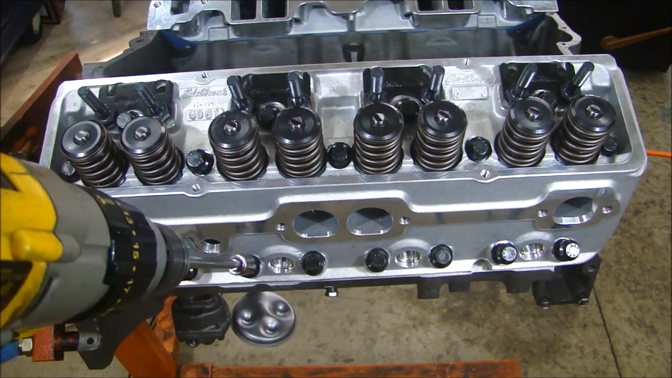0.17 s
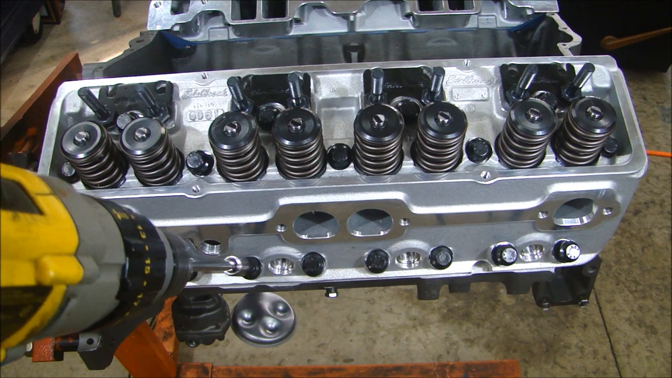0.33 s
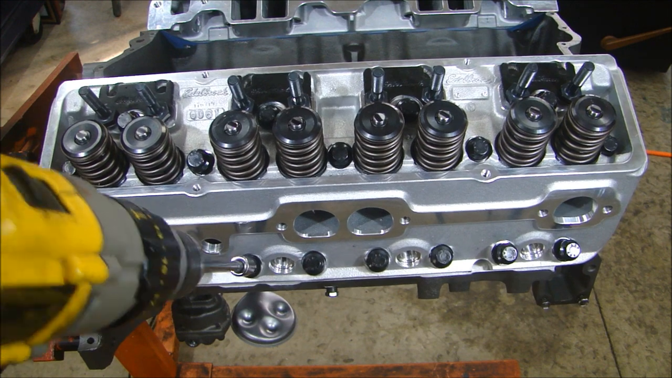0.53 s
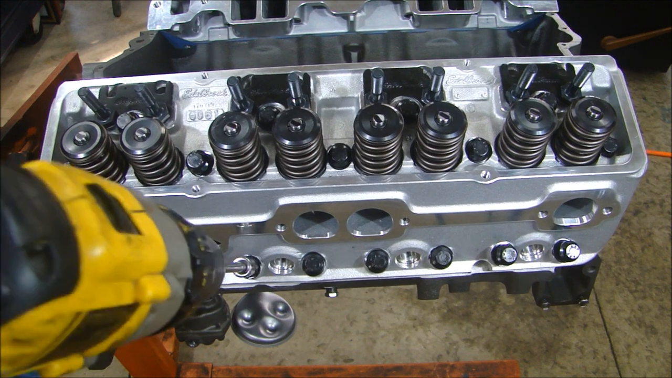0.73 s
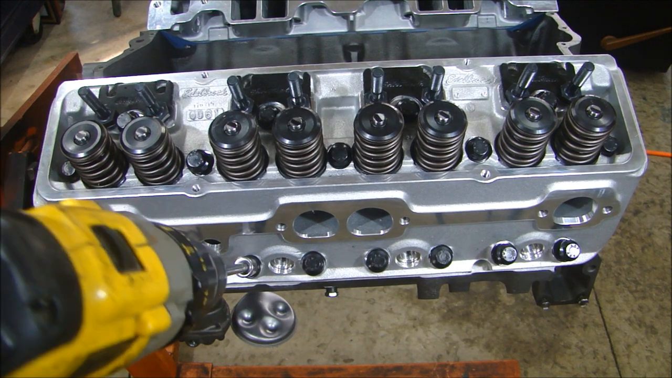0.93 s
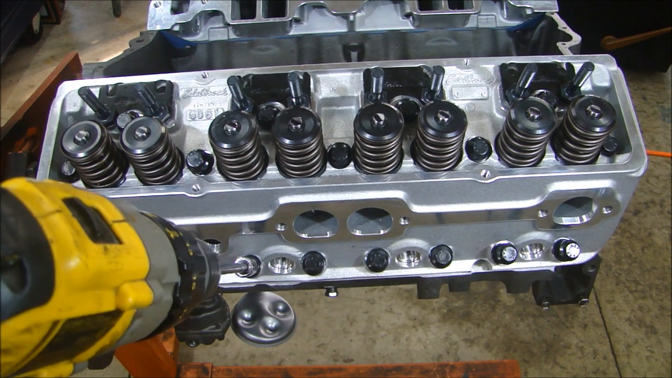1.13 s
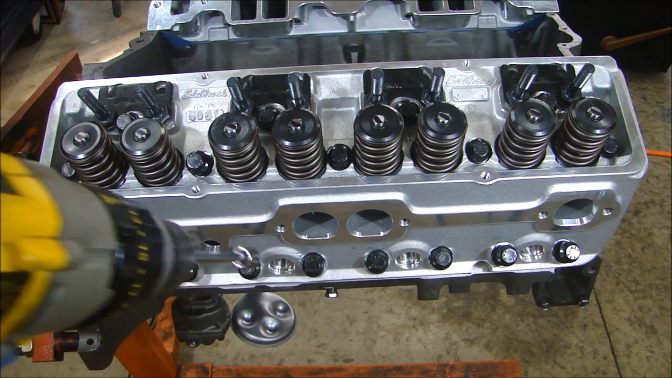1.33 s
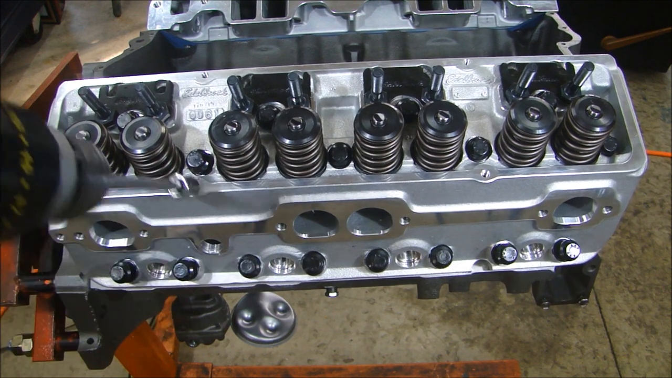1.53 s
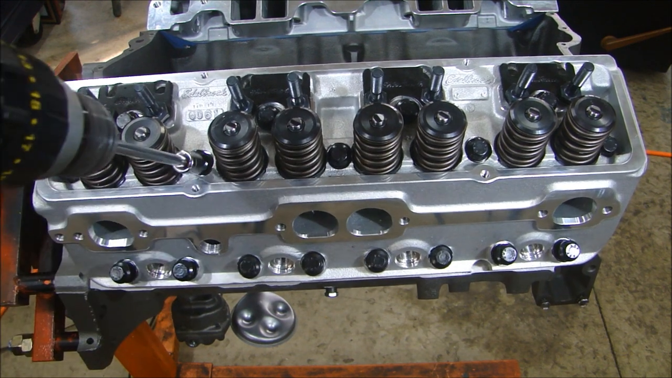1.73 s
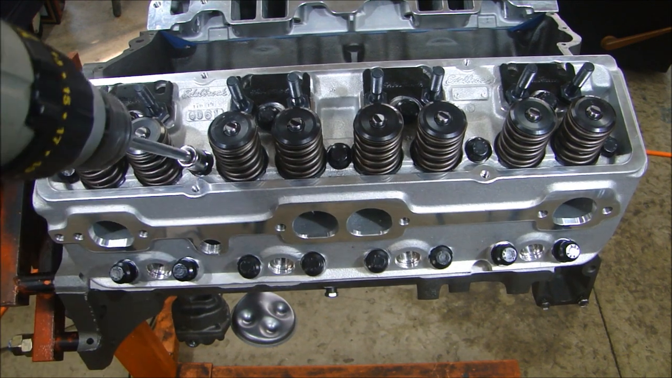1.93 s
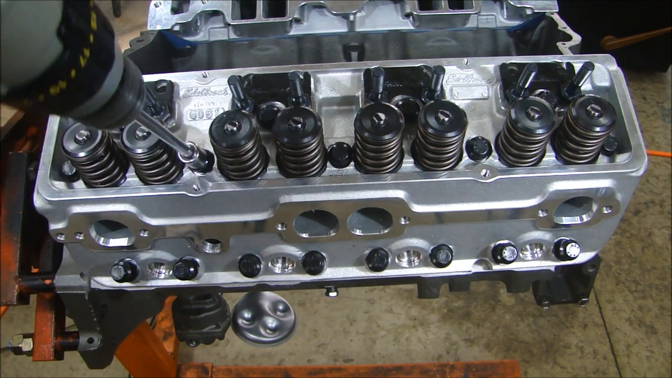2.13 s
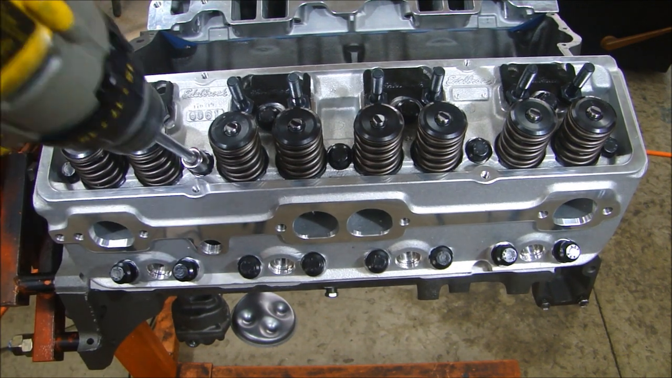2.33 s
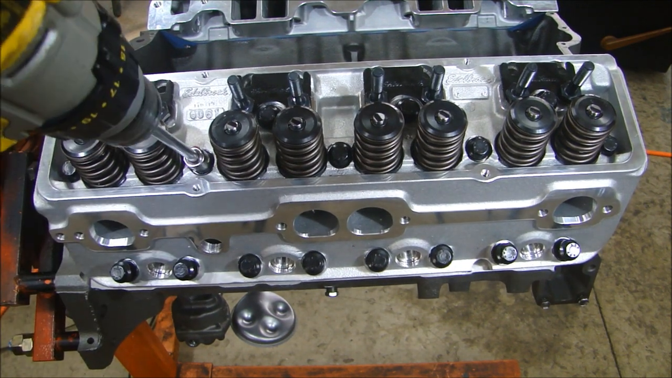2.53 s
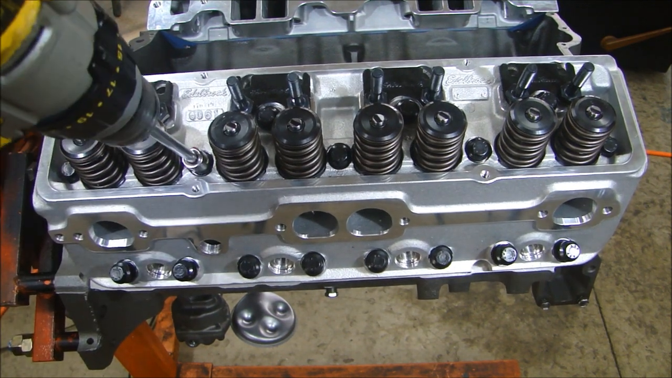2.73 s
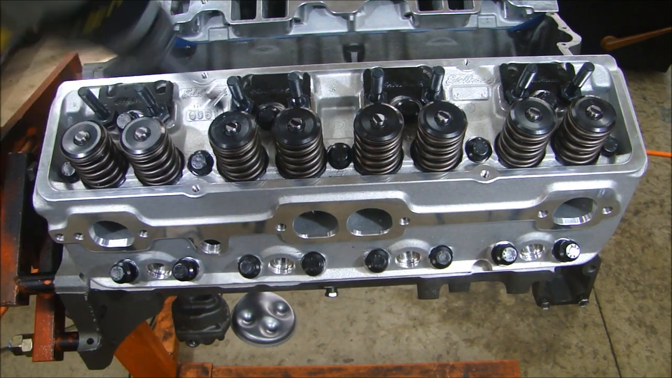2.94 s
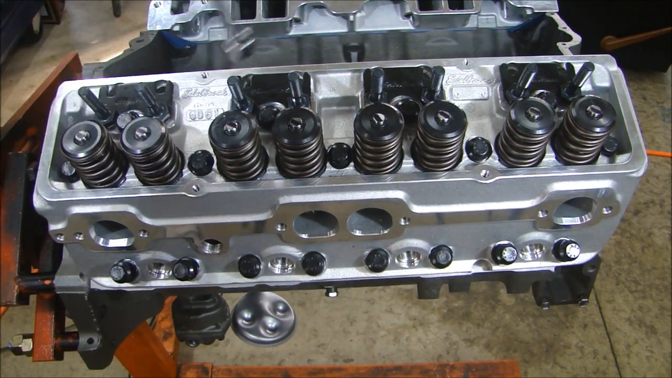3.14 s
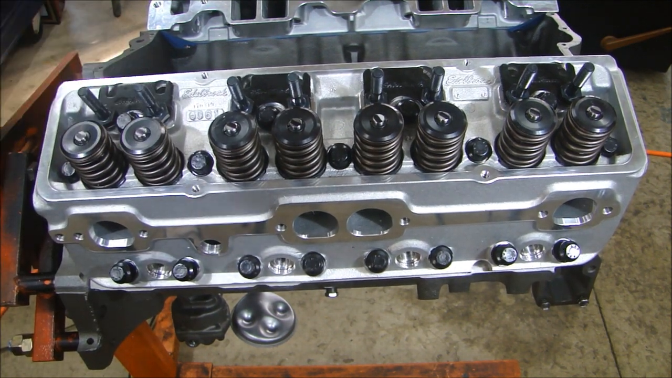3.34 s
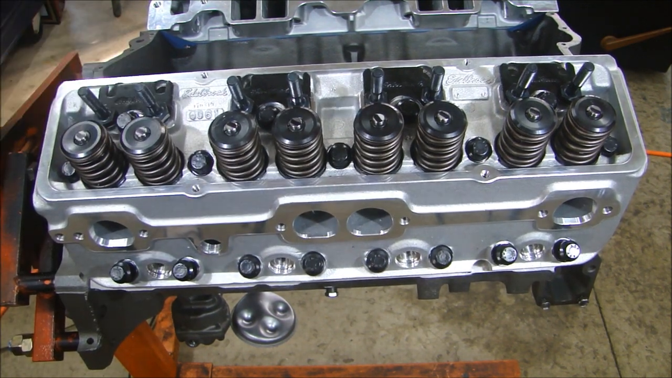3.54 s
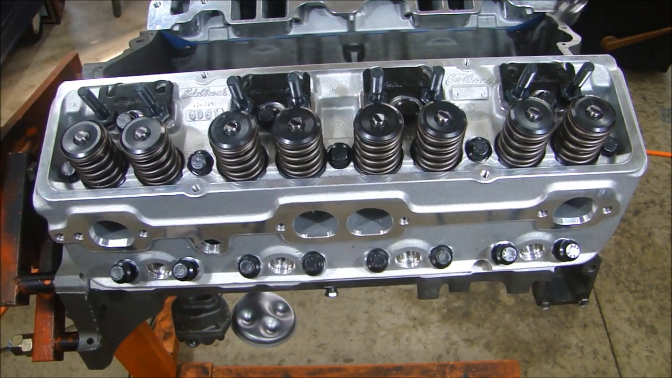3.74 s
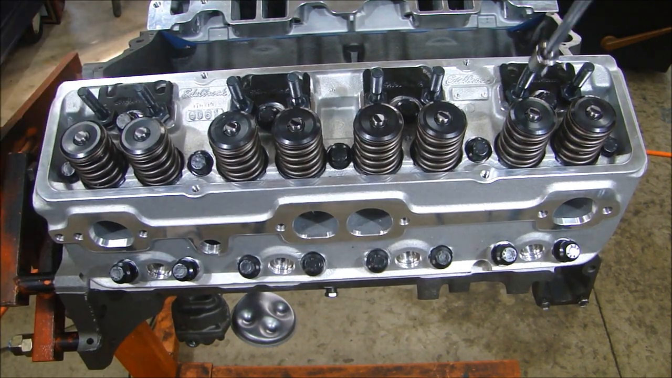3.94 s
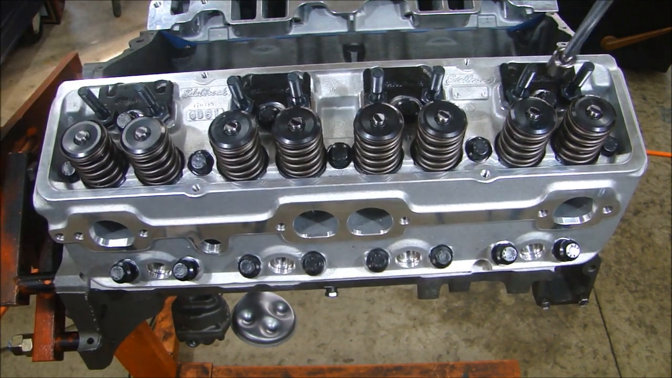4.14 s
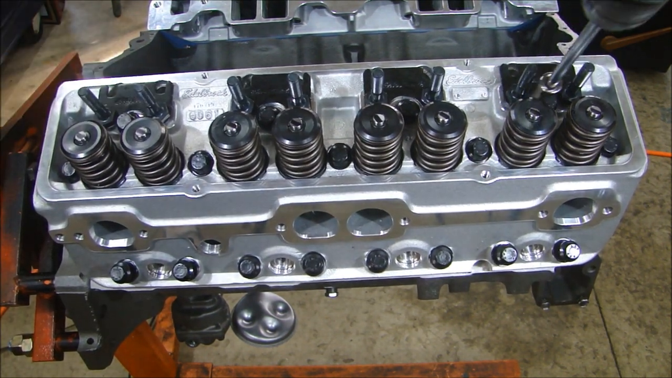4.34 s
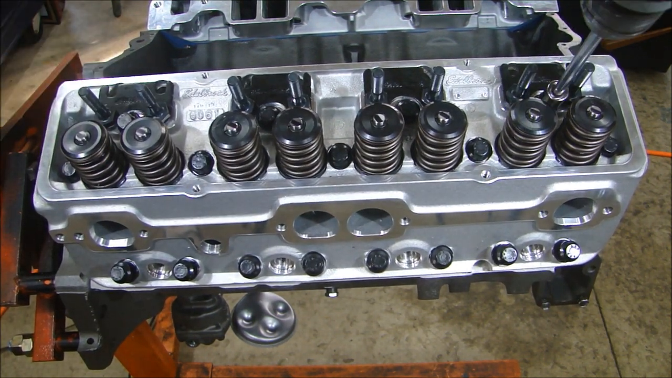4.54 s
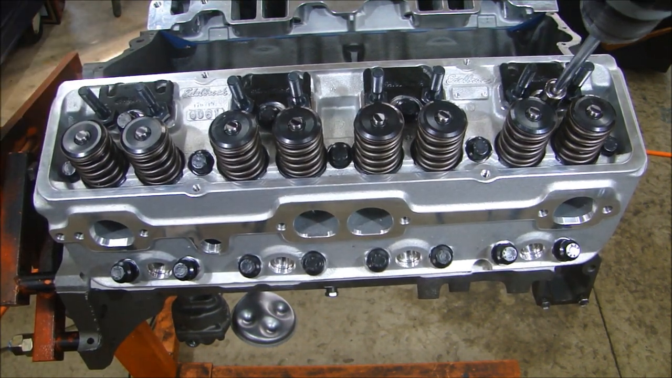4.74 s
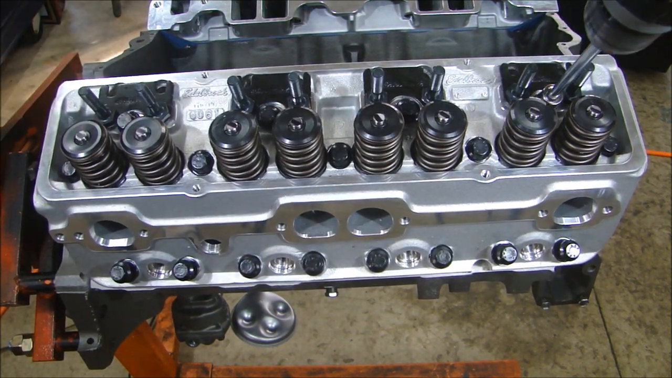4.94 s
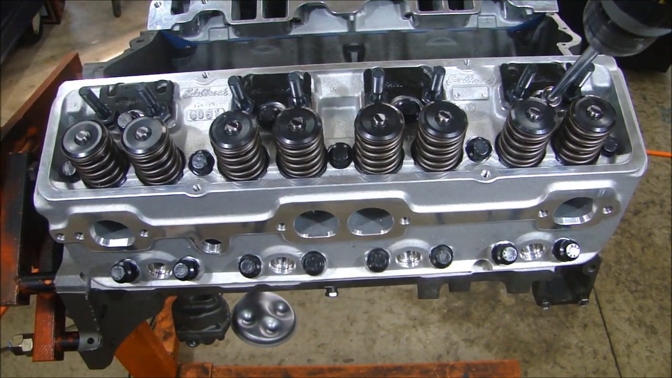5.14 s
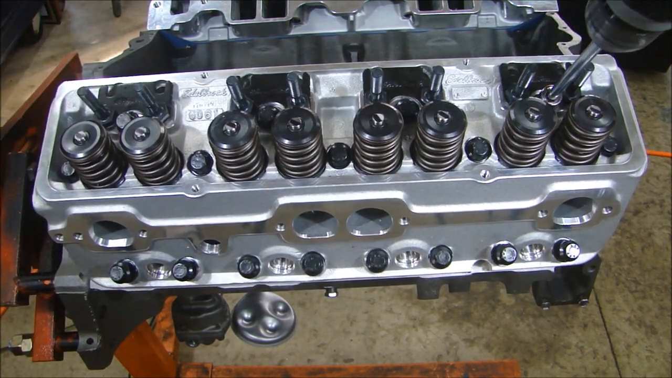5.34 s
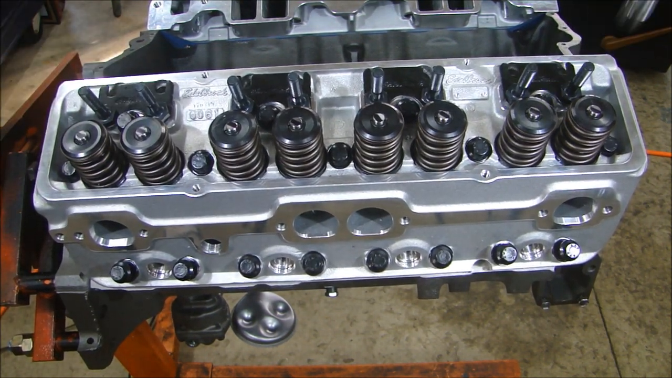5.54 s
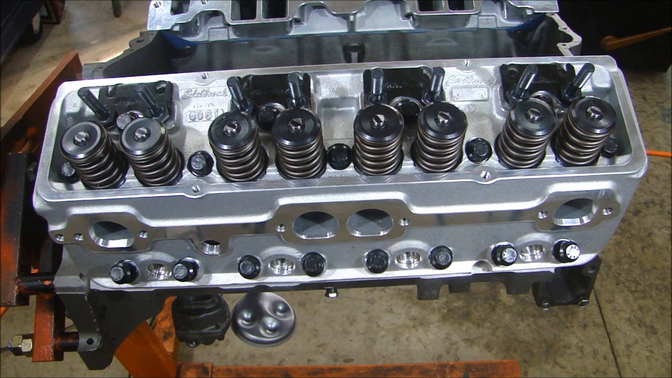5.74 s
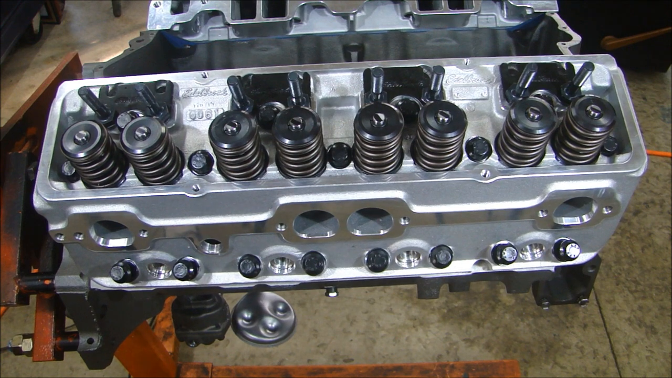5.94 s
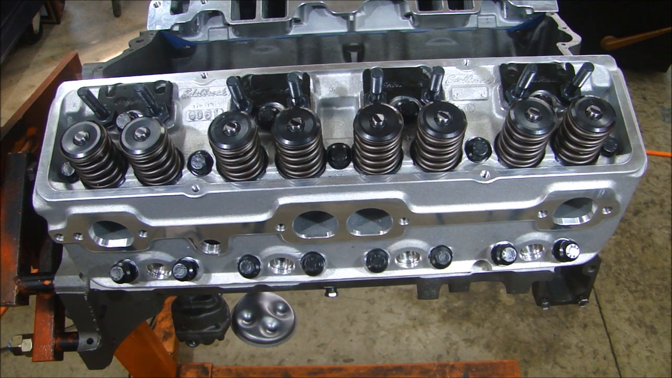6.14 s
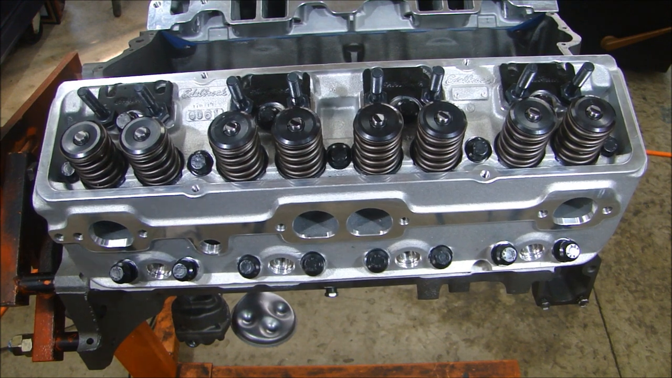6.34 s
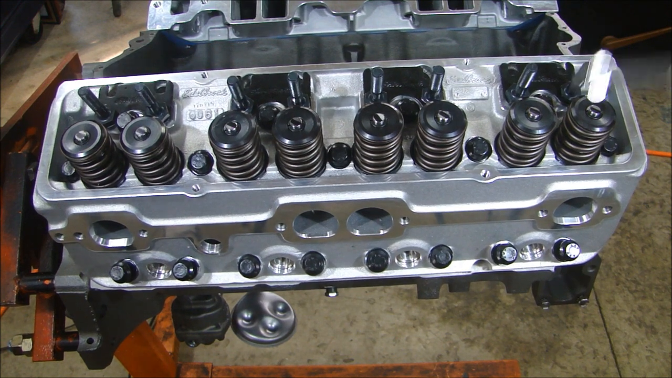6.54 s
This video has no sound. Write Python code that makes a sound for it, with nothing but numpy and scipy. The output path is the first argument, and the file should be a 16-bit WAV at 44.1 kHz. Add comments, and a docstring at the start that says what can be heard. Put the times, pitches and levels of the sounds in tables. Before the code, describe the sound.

Sharp metallic knocks come first, then a cordless drill bursts into a gritty, rising whine, a bolt clunks tight, and the clutch chatters in a harsh buzz before an abrupt brake click. This happens three times, with pauses of steel taps, cloth brushes and faint squeaks. Close, bright stereo with short garage echoes and quiet room hiss; the drill moves from left to right.

```python
"""In a garage, close to a pair of microphones, a steel extension rubs, knocks and rings on a cylinder head.
A cordless drill then runs down the first of three bolts: clacks, a motor spinning up and whining through its
gears, the clunk of the bolt seating, a ratcheting slip clutch, the spindle brake. Knocks and scuffs fill the
gaps before the second and third bolts, with faint squeaks from the later gap on; knocks and scuffs end it.
Noise, shaped and gated, makes the rough sounds; sines on motor and clutch turns make the whine and the buzz."""
import sys
import numpy as np
from scipy import signal
from scipy.fft import rfft, irfft
from scipy.io import wavfile
from scipy.ndimage import map_coordinates

SR = 44100
rng = np.random.default_rng(int(sys.argv[2]) if len(sys.argv) > 2 else 0)


def gain_from_db(level_db):
    """Convert decibel levels to linear amplitude factors (20 dB per decade)."""
    decades = np.asarray(level_db, float) / 20
    return 10 ** decades


def dump(signal):
    """Clip the signal to [-1, 1] and save it as 16-bit WAV at the path in sys.argv[1]."""
    limited = np.clip(np.atleast_2d(signal).T, -1, 1)
    pcm = np.round(limited * 32767).astype(np.int16)
    wavfile.write(sys.argv[1], SR, pcm)


N = 294588
TIME = np.arange(N) / SR


def rms_one(x):
    """Scale to rms 1."""
    return x / np.sqrt(np.mean(x ** 2) + 1e-20)


def at_hz(points, hz):
    """Read a table on a log-frequency axis."""
    table_hz, value = np.array(points).T
    return np.interp(np.log(hz), np.log(table_hz), value)


def coloured(x, spectrum):
    """Shape a signal by a spectrum in dB; rms 1."""
    hz = np.maximum(np.fft.rfftfreq(x.shape[-1], 1 / SR), 10)
    return rms_one(irfft(rfft(x) * gain_from_db(at_hz(spectrum, hz)), x.shape[-1]))


def drift(rate):
    """Slow chance of spread near 1: random knots, two per cycle of the rate [Hz], joined by lines."""
    knots = rng.standard_normal(int(N / SR * 2 * rate) + 2)
    return np.interp(TIME * 2 * rate, np.arange(len(knots)), knots) * 1.406


def cut(x, hz, kind, order=2):
    """Butterworth low- or high-pass."""
    return signal.sosfilt(signal.butter(order, min(hz, .45 * SR), kind, fs=SR, output="sos"), x)


def ring(clicks, hz, t60):
    """A unit click sets a dying sine of height 1 ringing, as one mode of a solid does."""
    r, w = gain_from_db(-60 / (t60 * SR)), 2 * np.pi * hz / SR
    return signal.lfilter([0, np.sin(w)], [1, -2 * r * np.cos(w), r * r], clicks + 1e-18)


def ramp(start, length):
    """0 before the start, 1 after the length."""
    return np.clip((TIME - start) / np.maximum(length, 1e-3), 0, 1)


def dying(start, length):
    """1 at the start, then an exponential decay; 0 before."""
    return (TIME >= start) * np.exp(-np.clip(TIME - start, 0, None) / length)


def swell(start, end):
    """A half sine between two times."""
    return np.sin(np.pi * ramp(start, end - start)).clip(0)


# the three trigger pulls:
# (trigger pressed [s], bolt seats [s], clutch falls silent [s], spindle stops [s])
TRIGGER_PULLS = [(.687, 1.012, 1.228, 1.262), (2.119, 2.538, 2.745, 2.77), (4.768, 5.142, 5.35, 5.398)]


def per_pull(rows):
    """Each column of a one-row-a-pull table, held from 0.1 s before its pull to the next."""
    pull = np.searchsorted([row[0] - .1 for row in TRIGGER_PULLS[1:]], TIME)
    return np.array(rows, float)[pull].T


# background of the garage: (frequency [Hz], relative density [dB per Hz])
AIR_SPECTRUM = [(24, -37), (40, -10.5), (298, -3.5), (496, -6), (631, -5), (844, -3.5), (2220, -13),
                (4700, -16), (5310, -25.5), (7450, -24.5), (13000, -27)]


def garage_air():
    """Steady background noise, unrelated at the two microphones, swelling slowly on both together."""
    air = coloured(rng.standard_normal((2, N)), AIR_SPECTRUM)
    return gain_from_db(-67.5) * gain_from_db(0.79 * drift(3.4)) * air


# steel rubbing: (frequency [Hz], relative density [dB per Hz])
RUB_SPECTRUM = [(150, -25), (400, -6), (1300, 0), (2100, -1), (3200, -10), (12000, -40)]
# cloth brushing: (frequency [Hz], relative density [dB per Hz])
BRUSH_SPECTRUM = [(1000, -30), (3000, -5), (5000, 0), (11000, -1)]
# handling strokes: (start [s], end [s], socket rubbing level [dB], sleeve brushing level [dB])
HANDLING_STROKES = [(-.06, 0.11, -63.5, -59), (1.827, 1.94, -56.5, -70), (3.007, 3.058, -60, -54),
                    (3.075, 3.192, -88, -54), (3.446, 4.02, -80, -79.5), (4.721, 4.765, -52.5, -93),
                    (5.885, 6.076, -56, -38.5), (6.01, 6.27, -61, -50), (6.254, 6.37, -66, -49.5)]


def scuffs(grain, patchy_db):
    """Rubbing is dense uneven grains in patches; cloth brushes more smoothly and higher."""
    skid_db, skid_brush_db, skid_fade_db_s = -27, -3, 277   # re knock, brush re skid, fade
    skid_s = 20 / np.log(10) / skid_fade_db_s
    # the socket skids after each knock
    skid = sum(gain_from_db(db + skid_db) * dying(s, skid_s) for s, db, *_ in EXTENSION_KNOCKS)
    rub, brush = skid, gain_from_db(skid_brush_db) * skid
    for start, end, rub_db, brush_db in HANDLING_STROKES:
        stroke = swell(start, end)
        rub = rub + gain_from_db(rub_db) * stroke
        brush = brush + gain_from_db(brush_db) * stroke ** 2
    uneven_db = grain * np.minimum(rng.exponential(1, N), 5)
    grains = rng.standard_normal(N) * gain_from_db(uneven_db + patchy_db * drift(60))
    cloth = rng.standard_normal(N) * gain_from_db(3.5 * drift(46))
    return rub * coloured(grains, RUB_SPECTRUM) + brush * coloured(cloth, BRUSH_SPECTRUM)


def cracks(blows):
    """Blows (s, rough peak dB, centre Hz, octaves) as noise bands; lower ones die more slowly."""
    snap, snap_s = 0.69, 0.0022   # the first contact is sharper than the crack after it
    t60_s = 0.045   # at 1.5 kHz
    out, after = np.zeros(N + SR), np.arange(SR // 8) / SR
    for s, db, hz, octaves in blows:
        at, wide = round(s * SR), 2 ** (max(octaves, .3) / 2)
        band = signal.butter(2, [hz / wide, min(hz * wide, .45 * SR)], "band", fs=SR, output="sos")
        decay = gain_from_db(-60 * after / (t60_s * (1500 / hz) ** 0.33))
        contact = 1 + snap * np.exp(-after / snap_s)
        crack = signal.sosfilt(band, rng.standard_normal(len(after)) * contact * decay)
        peak = 3 * np.sqrt(np.mean(crack[:SR // 400] ** 2))   # noise peaks near three times its rms
        out[at:at + len(after)] += gain_from_db(db) * crack / peak
    return out[:N]


# the extension against the head: (time [s], peak level [dB], centre [Hz], width [octaves])
EXTENSION_KNOCKS = [(.112, -43, 900, 1.8), (.137, -19, 2430, 5.1), (.149, -23.5, 1960, 2),
                    (.169, -29, 2760, 2.6), (.27, -40.5, 3500, 2.3), (.279, -35, 1400, 3.3),
                    (.291, -34.5, 850, 1.4), (.344, -38, 664, 5.4), (.431, -41, 2210, 2.4),
                    (.44, -20, 2550, 6.3), (.468, -29, 810, 3), (.586, -38, 427, 4.1),
                    (.595, -40, 2240, 3.4), (1.835, -33, 3570, 2.3), (1.857, -33.5, 1850, 1.8),
                    (1.918, -58, 2060, 2.2), (3.013, -27.5, 2000, 3.5), (3.035, -31.5, 1250, 1.5),
                    (3.075, -26, 2870, 3.3), (3.117, -30.5, 2210, 4.1), (3.75, -60, 4000, 4.1),
                    (3.843, -59, 1800, 1.6), (3.963, -61, 3000, 3.7), (4.065, -36, 1440, 2.5),
                    (4.077, -24, 1110, 2.8), (4.13, -49, 1410, 0.74), (4.449, -33.5, 3174, 6.1),
                    (4.453, -12.5, 1110, 2.36), (4.524, -30.5, 815, 2.8), (4.633, -49, 1090, 2.7),
                    (5.741, -31.5, 3930, 3.7), (5.862, -42, 3330, 2.5), (5.929, -32, 2500, 3.1),
                    (5.954, -33, 1820, 2.9), (5.965, -28, 1900, 5.2), (6.018, -36, 1280, 3.9),
                    (6.073, -39, 1640, 2.1), (6.103, -50, 1500, 2.5), (6.238, -36.5, 734, 0.92),
                    (6.264, -43, 1210, 2.8), (6.337, -44.5, 615, 1.3), (6.38, -42, 725, 1.4)]


def extension_knocks():
    """The steel extension knocks on the head, each blow a dying crack around its own centre."""
    return cracks(EXTENSION_KNOCKS)


# modes of the steel extension and head: (frequency [Hz], level [dB], t60 [s])
STEEL_MODES = [(2000, -6, .25), (2900, -12, .6), (3500, -10, .15), (4400, -6, .4), (4650, -6, .3),
               (7400, -8, .2)]
# knocks that leave the free extension ringing: (time [s], level [dB])
RINGING_KNOCKS = [(0.441, -64), (1.834, -64), (3.077, -61), (3.12, -62), (4.078, -73), (4.455, -69)]


def steel_ringing():
    """Some knocks set the modes of the steel ringing, each mode struck a little differently."""
    s, db = np.transpose(RINGING_KNOCKS)
    out = 0
    for hz, mode_db, t60 in STEEL_MODES:
        strikes = np.zeros(N)
        strikes[(s * SR).astype(int)] = gain_from_db(db + rng.normal(0, 3, len(s)))
        out = out + gain_from_db(mode_db) * ring(strikes, hz, t60)
    return out


# trigger ticks, gear take-up and brake: (time [s], peak level [dB], centre [Hz], width [octaves])
DRILL_CLACKS = [(0.675, -42.5, 1820, 1.1), (.702, -14, 1370, 1.7), (.714, -7, 1130, 1.3),
                (.721, -7, 2760, 3), (1.237, -6, 3020, 3.3), (1.257, -3, 3000, 2.93),
                (2.079, -47, 2770, 1.4), (2.101, -44.5, 1900, 1.5), (2.763, -10.5, 2940, 2.2),
                (4.726, -42, 1770, 2.9), (4.776, -11.5, 1840, 3.2), (5.366, -36, 3500, 1.9),
                (5.392, -16.5, 3200, 1.4)]


def drill_clacks():
    """Parts inside the drill strike each other in short cracks."""
    return cracks(DRILL_CLACKS)


# motor of each pull: (half speed reached [s], time constant [s], top speed [turns per s])
MOTOR_SPINUPS = [(.69, .058, 273.5), (2.158, .044, 265.5), (4.798, .047, 267.5)]


def motor_turning():
    """The motor nears top speed exponentially and loses turns as the bolt tightens."""
    press, seat, release, stop = per_pull(TRIGGER_PULLS)
    half, rise, top = per_pull(MOTOR_SPINUPS)
    slow = np.exp(-np.clip(TIME - half, -rise / 4, None) / rise) / 2   # share of top speed still missing
    load_sag_hz, load_s = 7, 0.048   # turns per s lost by the time of seating, growth
    speed = top * (1 - slow) - load_sag_hz * np.exp(np.clip((TIME - seat) / load_s, None, 1))
    turn = 2 * np.pi * np.cumsum(speed * (1 + .001 * drift(40))) / SR
    gate = ramp(press, 0.03) * (1 - ramp(stop - .003, 0.001))
    free = gate * (1 - ramp(seat, 0.023))   # closes after seating
    return turn, slow, gate, free


# gear noise: (frequency [Hz], relative density [dB per Hz])
GEAR_SPECTRUM = [(100, -59), (250, -23.5), (700, -9.5), (1500, -8.5), (2500, -5), (4600, -4), (7000, 0),
                 (12000, 8)]
# housing resonance as grip and angle change, a row a pull: (frequency [Hz], width [Hz], re gear noise [dB])
HOUSING_MODES = [(2850, 300, -15), (4600, 700, -12), (3250, 350, -9)]
# loudness of each pull: (gear noise [dB], treble re gear noise [dB], whine [dB])
PULL_EFFORT = [(-22.5, 1.5, -27.5), (-24, 3, -29), (-24, 4.5, -29.5)]


def gear_noise(turn, slow, gate, free, throb, grain_db):
    """Gear teeth grind in a throb once a turn, and the housing resonates to them."""
    press, seat, release, stop = per_pull(TRIGGER_PULLS)
    level_db, treble_db, _ = per_pull(PULL_EFFORT)
    coast = ramp(release, stop - release)
    # fades at 18.5 dB per s, jumps at seating, loses 1 dB by the stop
    level_db = level_db - 18.5 * (TIME - press) + 3.5 * ramp(seat, 0.0033) - coast
    treble_db = treble_db - 6 * slow
    growl_db = -16.5 + 11.5 * slow + 11 * dying(seat, .06) + 19.5 * coast   # stronger slow, seated, coasting
    grains = gain_from_db(grain_db * rng.standard_normal(N))
    teeth = rng.standard_normal(N) * grains * (1 + throb * np.cos(turn))
    grind = coloured(teeth, GEAR_SPECTRUM) * gain_from_db(drift(25))
    growl = rms_one(cut(grind, 1200, "low", order=4))
    middle = rms_one(cut(cut(grind, 1200, "high", order=4), 5000, "low", order=4))
    treble = rms_one(cut(grind, 5000, "high", order=4))
    noise = middle + gain_from_db(treble_db) * treble + gain_from_db(growl_db) * growl
    pull, = per_pull([[0], [1], [2]])
    # the housing answers once the motor is near full speed
    for k, (hz, width_hz, db) in enumerate(HOUSING_MODES):
        resonance = rms_one(ring(teeth, hz, 2.2 / width_hz))
        noise = noise + (pull == k) * free * (1 - slow) ** 4 * gain_from_db(db) * resonance
    # a rough sweep while the motor pulls up
    launch = drift(120) * np.sin(7 * turn) + .7 * drift(120) * np.sin(13 * turn)
    noise = noise + gain_from_db(-3) * dying(press, .045) * launch
    return gate * gain_from_db(level_db.clip(None, 0)) * noise


# whine lines: (multiple of the motor turn, roughness [0-1], level in first, second, third pull [dB])
WHINE_LINES = [(6, .2, -18, -18, -6), (7, .06, 0, 0, -2), (12, .7, -9, -13, -1), (13, .6, -15, -10, 2),
               (14, .15, -16, -7, -9), (15, .3, -18, -12, -15), (17, .06, -15, -3, 0),
               (18, .25, -12, -7, -10)]


def motor_whine(turn, slow, free, waver_db):
    """Tooth and commutator counts whine as multiples of the turn, some of them rough."""
    press = per_pull(TRIGGER_PULLS)[0]
    level_db = per_pull(PULL_EFFORT)[2]
    level_db = level_db - 12.5 * (TIME - press).clip(0, 1)   # softens as the bolt runs down, dB per s
    pull = per_pull([[0], [1], [2]])[0].astype(int)
    whine = 0
    for multiple, rough, *levels in WHINE_LINES:
        steady = gain_from_db(waver_db * drift(30) - 18 * slow)   # weaker below top speed
        height = (1 - rough) * steady + rough * drift(150)
        line = np.sin(multiple * turn + rng.uniform(0, 2 * np.pi))
        whine = whine + gain_from_db(np.take(levels, pull)) * height * line
    return free * gain_from_db(level_db) * np.sqrt(2) * whine


def motor():
    """Gear noise and whine ride on one turning shaft."""
    turn, slow, gate, free = motor_turning()
    noise = gear_noise(turn, slow, gate, free, throb=0.3, grain_db=2.0)
    return noise + motor_whine(turn, slow, free, waver_db=4.0)


def bolt_seating():
    """Each bolt seats with a broad, quickly dying clunk."""
    return cracks([(seat, -10, 1700, 2.6) for _, seat, _, _ in TRIGGER_PULLS])


# clutch buzz: (multiple of the click-pair rate, relative level [dB])
BUZZ_HARMONICS = [(1, -27.5), (2, -8), (3, -16), (4, 0.5), (5, -3.5), (6, 2), (7, -14), (8, -2), (9, -18.5),
                  (10, -45), (11, -7), (12, -11)]
# clutch rattle: (frequency [Hz], relative density [dB per Hz])
RATTLE_SPECTRUM = [(71, -86), (120, -49), (365, -4.5), (507, -24), (751, -1.5), (828, 6.5), (1130, -19),
                   (1210, 5.5), (2830, 4.5), (6000, -25), (9000, 2), (13200, -32)]
# clutch of each pull:
# (base rate [strong-weak click pairs per s], settling time [s], buzz level [dB], fade [dB per s])
CLUTCH_SLIPS = [(188.5, 0.01807, -24.5, 6), (188, 0.0064, -25, 34), (187.1, 0.00778, -27, 4)]


def clutch(waver_db, rattle_db, sharp):
    """Balls hop over detents, strong and weak in turn: a harmonic buzz, and a rattle bursting at each hop."""
    press, seat, release, stop = per_pull(TRIGGER_PULLS)
    rate, settle, level_db, fade = per_pull(CLUTCH_SLIPS)
    rush_hz, sag_hz_s, drop_hz = 44.96, 8, 22   # extra pairs per s at seating; slowing; loss at the release
    attack_s, release_s = 0.011, 0.0468
    slipping = np.clip(TIME - seat, 0, 1)
    ending = ramp(release - release_s, release_s)
    # the slipping slows as the trigger lets go
    rate = rate + rush_hz * dying(seat, settle) - sag_hz_s * slipping - drop_hz * ending ** 2
    gate = ramp(seat, attack_s) * (1 - ending)
    pair = 2 * np.pi * np.cumsum(rate * (1 + 0.0048 * drift(60))) / SR
    buzz = 0
    for k, db in BUZZ_HARMONICS:
        buzz = buzz + gain_from_db(db + waver_db * drift(60)) * np.cos(k * pair - 0.161 * k * k)
    hops = np.exp(sharp * (np.cos(2 * pair) + 0.15 * np.cos(pair)))
    rattle = coloured(hops * rng.standard_normal(N), RATTLE_SPECTRUM)
    return gate * gain_from_db(level_db - fade * slipping) * (rms_one(buzz) + gain_from_db(rattle_db) * rattle)


# faint squeaks and scrapes of steel on steel:
# (start [s], end [s], start pitch [Hz], end pitch [Hz], level [dB])
STEEL_SQUEAKS = [(3.66, 3.805, 3550, 3510, -79), (3.73, 3.9, 4150, 4170, -83),
                 (4.19, 4.439, 2980, 2890, -80), (6.12, 6.214, 1700, 2130, -56),
                 (6.36, 6.45, 2450, 2350, -72)]


def squeaks():
    """Stick-slip near one pitch: a gliding, wobbling tone that swells and fades."""
    out = 0
    for start, end, from_hz, to_hz, db in STEEL_SQUEAKS:
        glide = to_hz - from_hz
        wobble_hz = 14 + 0.227 * abs(glide)   # a wider glide wobbles more
        hz = from_hz + glide * ramp(start, end - start) + wobble_hz * drift(120)
        tone = np.sin(2 * np.pi * np.cumsum(hz) / SR)
        out = out + np.sqrt(swell(start, end)) * gain_from_db(db) * (0.5 + drift(90)) * tone
    return out


# reverberation of the garage: (frequency [Hz], t60 [s])
GARAGE_T60 = [(250, 0.39), (1000, 0.59), (4000, 0.65), (12000, 0.37)]


def garage_echoes(x):
    """Reflections, unrelated on each side: a short cluster off the engine block, then the walls by octaves."""
    near_db, near_t60_s, near_hz = -6, .07, 800
    wall_db = -10
    after, walls = np.arange(SR) / SR, 0
    for hz in 180 * 2. ** np.arange(7):
        band = signal.butter(2, [hz / np.sqrt(2), hz * np.sqrt(2)], "band", fs=SR, output="sos")
        noise = signal.sosfilt(band, rng.standard_normal((2, SR)))
        walls = walls + noise * gain_from_db(-60 * after / at_hz(GARAGE_T60, hz))
    walls = walls * np.clip(after / 0.018, 0, 1)   # builds up over 18 ms
    near = cut(rng.standard_normal((2, SR)) * gain_from_db(-60 * after / near_t60_s), near_hz, "high")
    echoes = (gain_from_db(wall_db) * rms_one(walls) + gain_from_db(near_db) * rms_one(near)) / np.sqrt(SR)
    return signal.fftconvolve(x[None], echoes, axes=1)[:, :N]


# where the drill is: (time [s], left over right [dB], left lags right by [microseconds])
DRILL_PLACE = [(0, 5, -56), (1.5, 3, -67), (2.0, 6.5, -36), (3.0, 9, -65), (3.801, -4, 26), (4.5, -6.5, 27),
               (5.5, -10, 51), (6.68, -4.5, 65)]


def microphone_pair(tool):
    """The tool reaches the nearer microphone earlier and louder."""
    s, pan_db, lag_us = np.transpose(DRILL_PLACE)
    pan_db, lag_us = np.interp(TIME, s, pan_db), np.interp(TIME, s, lag_us)
    lag = lag_us * 1e-6 * SR   # in samples
    sides = []
    for side in (1, -1):   # left, right
        heard = map_coordinates(tool, [np.arange(N) - side * lag / 2], order=3)
        sides.append(gain_from_db(side * pan_db / 2) * heard)
    return np.array(sides)


def scene():
    """Handling, drill and steel, heard direct and by reflection over the garage background."""
    tool = scuffs(grain=3.5, patchy_db=2.0) + extension_knocks() + steel_ringing()
    tool = tool + drill_clacks() + motor() + bolt_seating()
    tool = tool + clutch(waver_db=1.25, rattle_db=0.0, sharp=0.83) + squeaks()
    tool = cut(tool, 190, "high", order=4)   # a small tool radiates no bass
    return microphone_pair(tool) + garage_echoes(tool) + garage_air()


def gain_control(x, knee_db, lift_db, slope, release_db_s, attack_s):
    """Quiet passages are lifted; the gain drops within milliseconds on loud sound and creeps back."""
    keep = np.exp(-1 / (attack_s * SR))
    power = signal.lfilter([1 - keep], [1, -keep], np.mean(x ** 2, axis=0))
    level = 10 * np.log10(power + 1e-12)
    # the held level falls no faster than the release
    held = np.maximum.accumulate(level + release_db_s * TIME) - release_db_s * TIME
    return x * gain_from_db(np.clip(slope * (knee_db - held), 0, lift_db))


def top_cut(x):
    """Nothing passes above the cut-off."""
    return signal.sosfilt(signal.butter(12, 14030, fs=SR, output="sos"), x)


def record(dry):
    """Gain control, rounded peaks, a bass cut with the right side a little fuller below, a treble cut."""
    x = gain_control(dry, knee_db=-24, lift_db=13, slope=.4, release_db_s=90, attack_s=.008)
    x = .62 * np.tanh(x / .62)
    x = x + cut(x, 2000, "low", order=1) * [[-.12], [.12]]   # left thinner, right fuller
    x = cut(x, 134, "high")
    mix = cut(x, 11370, "low", order=12)
    return top_cut(mix)


dry = scene()
out = record(dry)
dump(out)
```